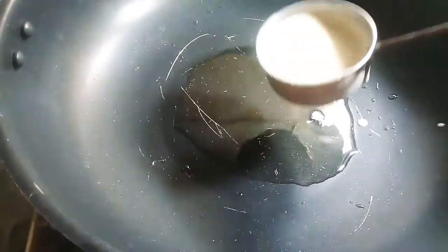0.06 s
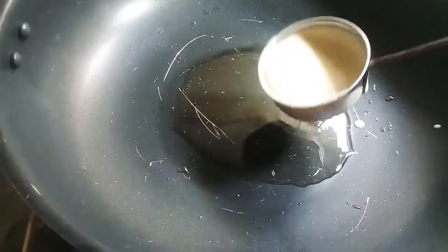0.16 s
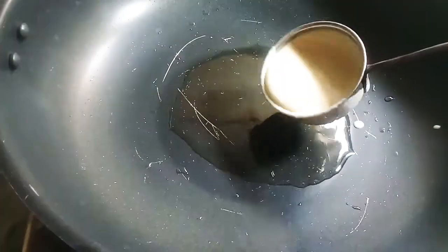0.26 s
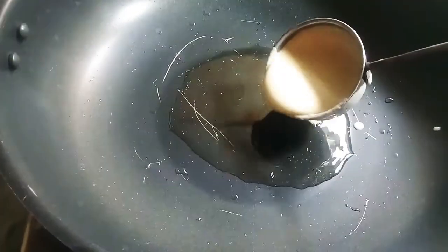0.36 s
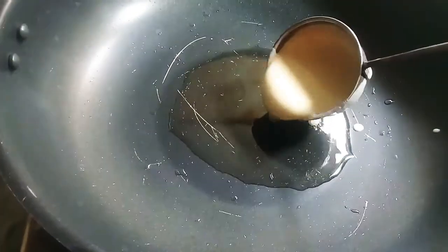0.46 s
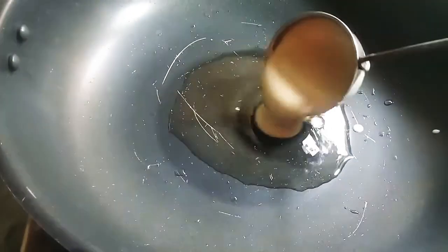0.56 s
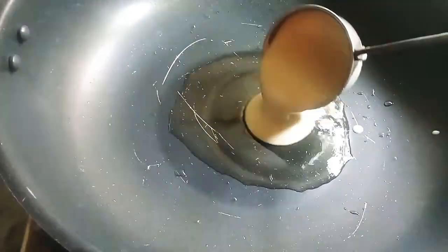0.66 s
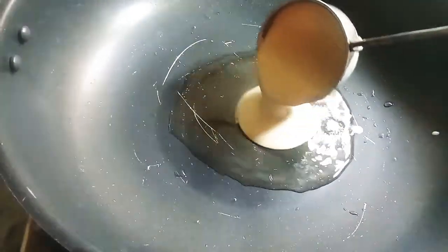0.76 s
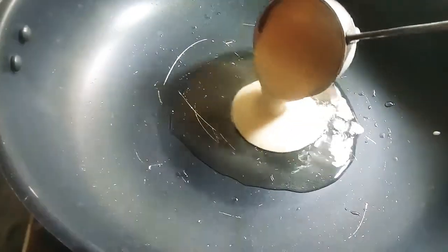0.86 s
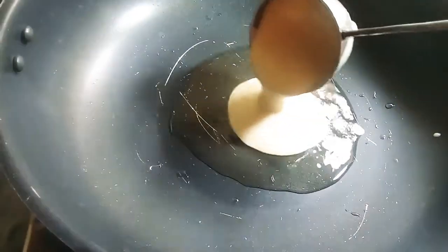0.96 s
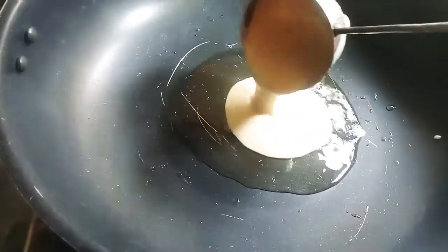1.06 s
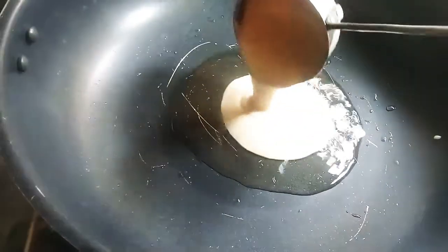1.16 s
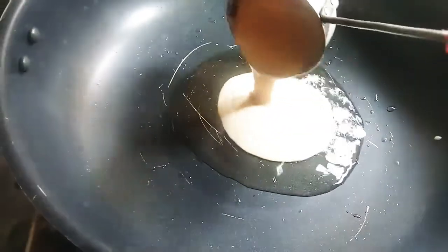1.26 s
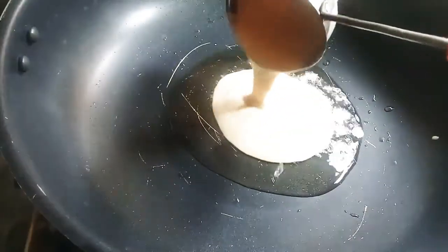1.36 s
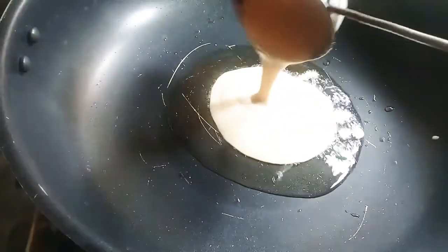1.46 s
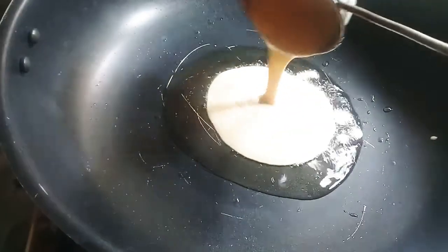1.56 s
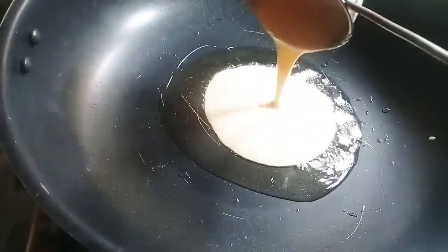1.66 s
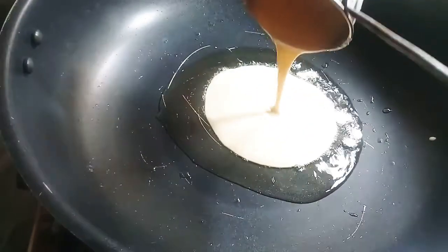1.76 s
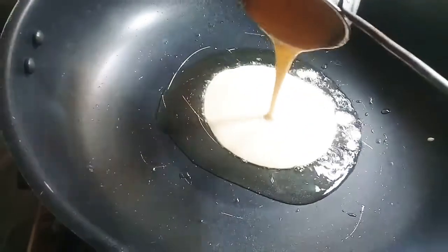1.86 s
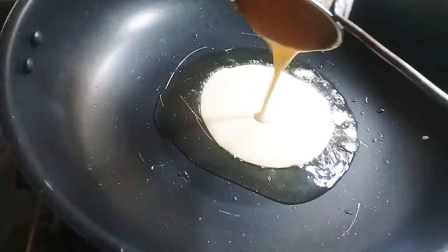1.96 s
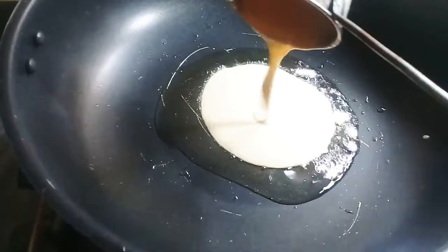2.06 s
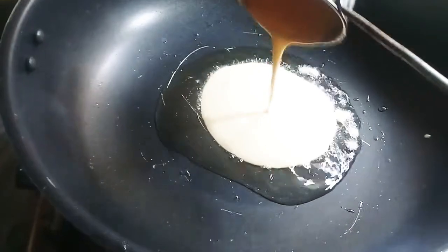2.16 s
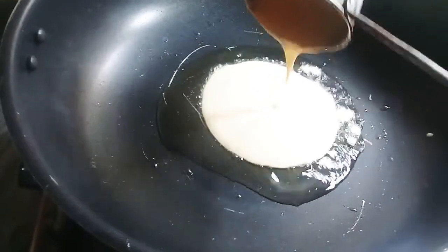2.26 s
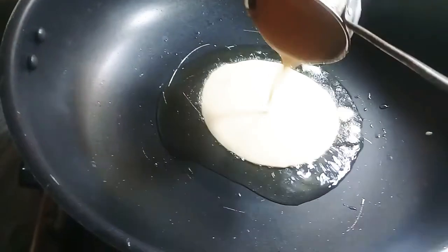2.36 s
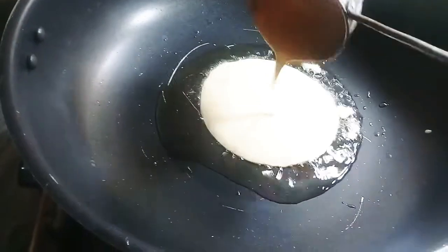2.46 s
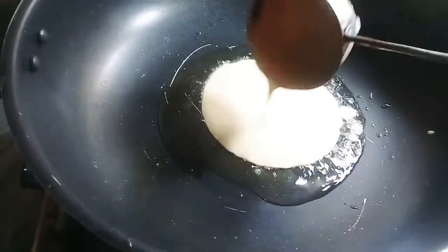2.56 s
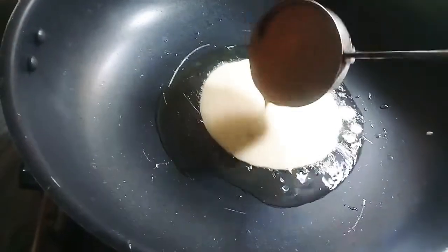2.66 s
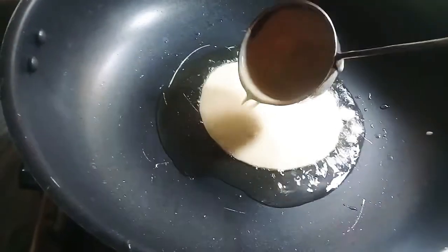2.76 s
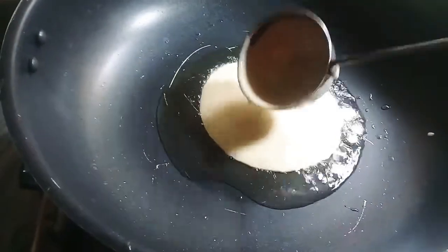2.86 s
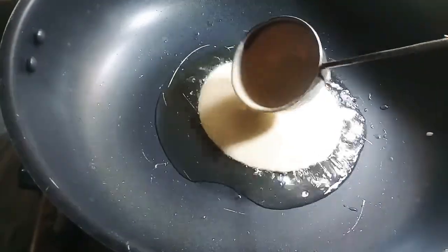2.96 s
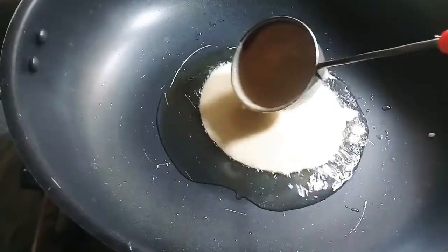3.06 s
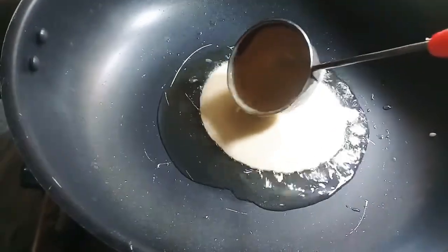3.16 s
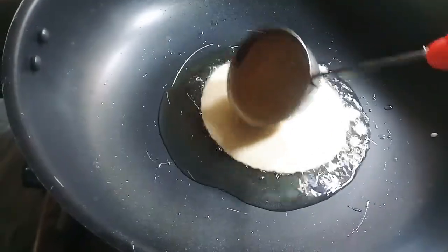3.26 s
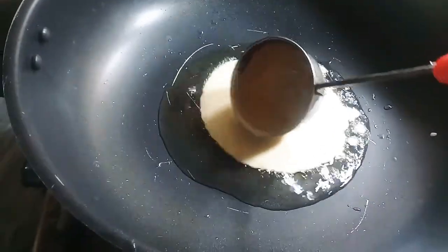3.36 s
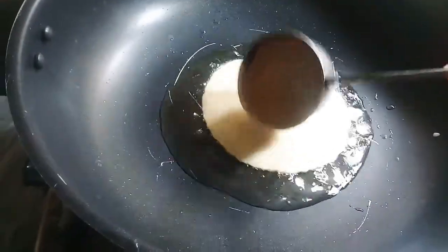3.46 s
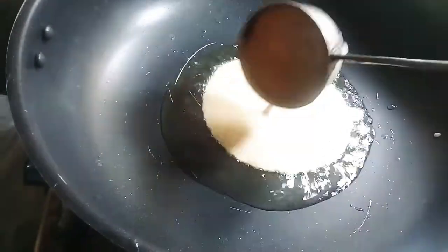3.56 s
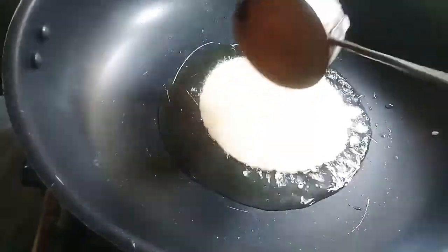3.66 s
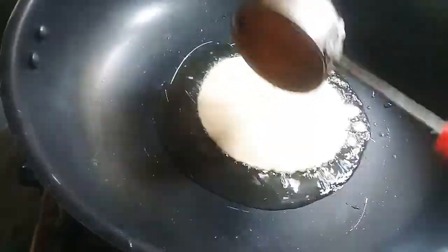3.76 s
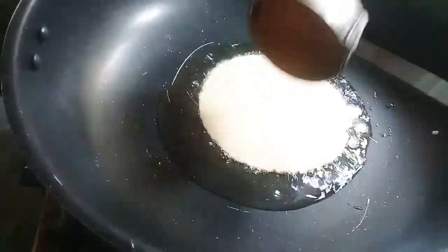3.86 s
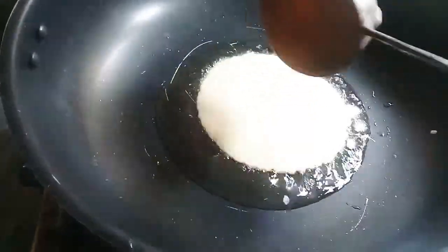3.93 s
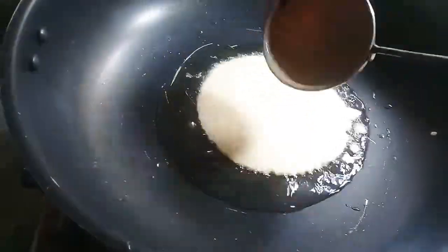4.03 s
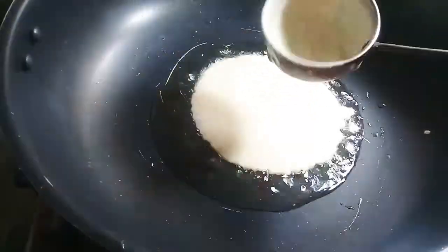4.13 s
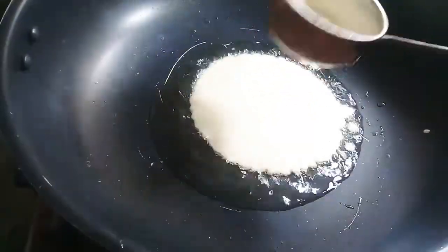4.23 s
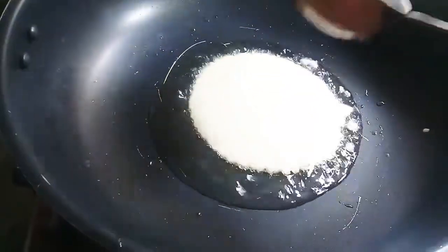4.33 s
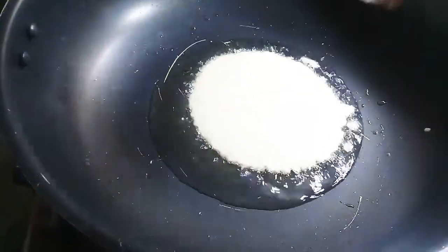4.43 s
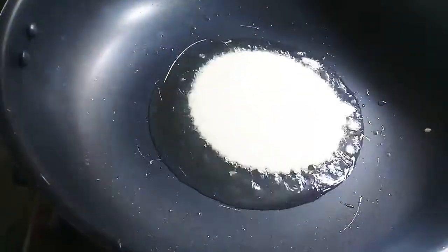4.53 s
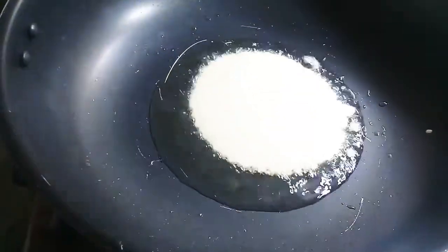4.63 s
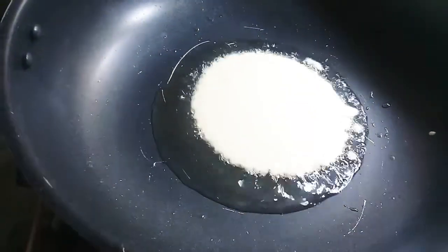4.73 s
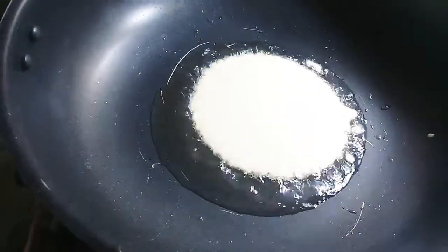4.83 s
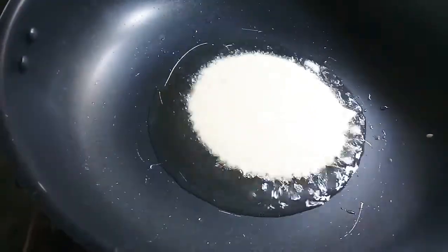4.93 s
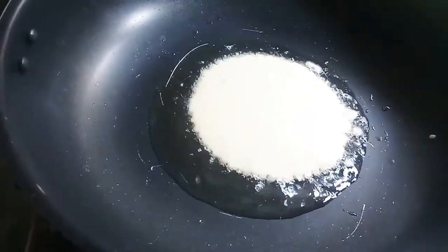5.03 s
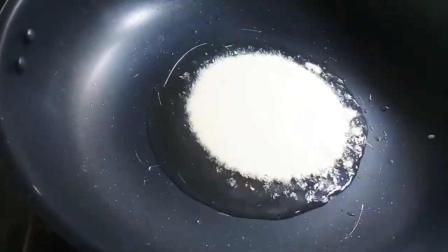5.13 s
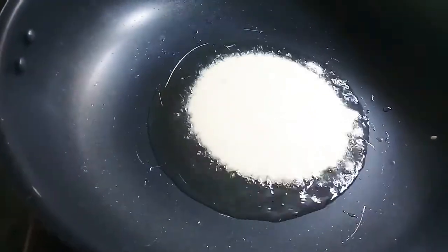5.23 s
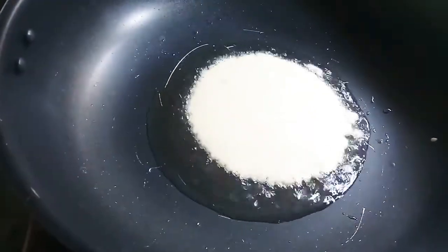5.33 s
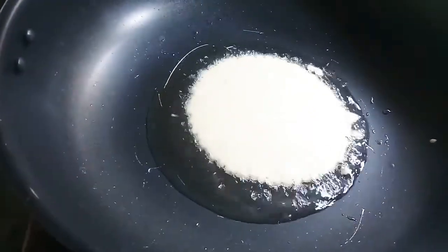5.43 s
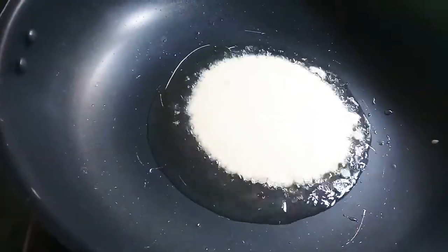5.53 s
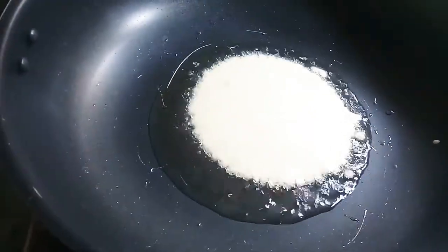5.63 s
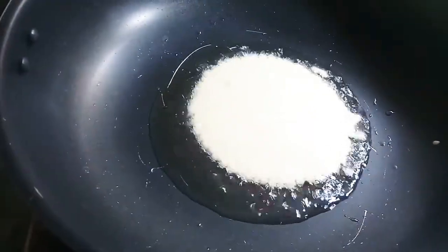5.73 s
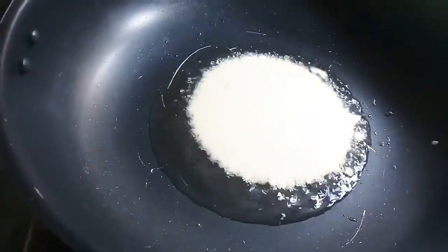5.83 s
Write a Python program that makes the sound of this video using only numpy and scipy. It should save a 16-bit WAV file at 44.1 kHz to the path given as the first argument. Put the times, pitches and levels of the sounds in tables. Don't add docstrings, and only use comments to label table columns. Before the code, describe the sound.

Close frying in a wide steel pan: faint drops and dribble first, then batter hits hot oil and a dense, bright sizzle leaps up. It cools steadily, with scattered ticks and a cluster of louder spits midway. Near the end a ladle touches a bowl, then clinks sharply on steel, stirring a last flurry. One close microphone, quiet kitchen, low rumble behind.

```python
import sys
import numpy as np
from scipy import signal
from scipy.fft import rfft, irfft, next_fast_len
from scipy.io import wavfile

SR = 44100
rng = np.random.default_rng(int(sys.argv[2]) if len(sys.argv) > 2 else 0)


def to_wav(s):
    ch = np.atleast_2d(s).T
    pcm = np.round(np.clip(ch, -1, 1) * 32767)
    wavfile.write(sys.argv[1], SR, pcm.astype(np.int16))


def nominal_scale(level):
    x = np.asarray(level, float) / 20
    return 10 ** x


N = 259749


def evened(x):
    return x / np.sqrt(np.mean(x ** 2) + 1e-20)


def read(points, hz):
    f, value = np.transpose(points)
    return np.interp(np.log(hz + 1), np.log(f + 1), value)


def add(mix, s, sound):
    part = mix[round(s * SR):][:len(sound)]
    part += sound[:len(part)]


def coloured(x, gain):
    size = next_fast_len(len(x))
    hz = np.fft.rfftfreq(size, 1 / SR)
    return irfft(rfft(x, size) * gain(hz), size)[:len(x)]


def wander(rate_hz, slowest_hz=0.):
    noise = rng.standard_normal(N)
    return evened(coloured(noise, lambda f: (f >= slowest_hz) / (1 + (f / rate_hz) ** 2)))


def sine(hz, t):
    return np.sin(2 * np.pi * hz * t)


def puffs(rows, rise_s, body=np.ones_like):
    out, t = np.zeros(N), np.arange(8192) / SR
    for s, db, hz, t60, share in rows:
        half_width = share * hz / 2
        noise = rng.standard_normal(len(t))
        noise = evened(coloured(noise, lambda f: body(f) / (1 + ((f - hz) / half_width) ** 4)))
        fade = nominal_scale(db - 8.5 - 60 * t / t60)
        add(out, s, fade * noise * np.minimum(t / rise_s, 1))
    return out


# pitch in Hz, strength in dB per Hz.
RUMBLE_COLOUR = [(12, -44), (20, -15), (49, -17), (92, 2), (111, -4.5), (125, -9), (161, -17), (195, -11),
                 (235, -18.5), (330, -11.5), (450, -19.5), (620, -26.5), (850, -35), (1600, -46)]
# pitch in Hz, width of its wavering in Hz, level in dB.
HUM_TONES = [(102.5, 1.1, -58.5), (85, 13, -65.5)]


def appliances():
    rumble_db, hiss_db = -54.5, -84
    t = np.arange(N) / SR
    rumble = coloured(rng.standard_normal(N), lambda f: nominal_scale(read(RUMBLE_COLOUR, f)))
    out = nominal_scale(rumble_db - 2.5) * evened(rumble)
    for hz, width_hz, db in HUM_TONES:
        level = nominal_scale(db + 2.1 * wander(width_hz))
        out += level * np.sqrt(2) * np.sin(2 * np.pi * hz * t + 0.55 * wander(width_hz))
    return out + far_motor(t) + nominal_scale(hiss_db) * rng.standard_normal(N)


def far_motor(t):
    loudest_s, hold_s, hz, db = 2.21, 0.2, 130, -53.5
    rise_db_per_s, fall_db_per_s = 103, 132
    before = np.maximum(loudest_s - t, 0)
    after = np.maximum(t - loudest_s - hold_s, 0)
    swell_db = -rise_db_per_s * before - fall_db_per_s * after
    return nominal_scale(db + swell_db) * np.sqrt(2) * sine(hz, t)


def kitchen(x, t60=.25):
    taps = np.zeros(SR // 3)
    at = np.arange(120, len(taps) - 20, 20)
    taps[at + rng.integers(0, 20, len(at))] = rng.choice([-1., 1.], len(at))
    taps *= nominal_scale(-60 * np.arange(len(taps)) / SR / t60)
    return signal.fftconvolve(x, taps / np.linalg.norm(taps))[:N]


# start in seconds, peak in dB, centre in Hz, time to die by 60 dB in seconds, width as a share of centre.
LADLE_KNOCKS = [
    (0.563, -37.5, 326, 0.17, 0.74),
    (5.405, -29.5, 1440, 0.28, 0.96),
    (5.479, -40, 1510, 0.19, 0.94),
    (5.53, -33, 1460, 0.12, 0.41),
    (5.665, -34.5, 1110, 0.35, 0.71),
    (5.699, -33, 1100, 0.16, 0.26),
    (5.789, -35, 320, 0.39, 0.92),
]


def knocks():
    return puffs(LADLE_KNOCKS, 0.0019)


def struck(modes_hz, modes, contact, wobble_db, rises_s):
    out, t = np.zeros(N), np.arange(SR // 2) / SR
    *contacts_s, blow_db = contact
    for hz, (*blows_db, t60) in zip(modes_hz, modes):
        swing = sum(np.sin(2 * np.pi * (f * t + rng.random())) for f in rng.uniform(5.1, 23.5, 3))
        level_db = wobble_db * swing * np.minimum(t / 0.13, 1) - 60 * t / t60
        ring = nominal_scale(level_db) * np.sin(2 * np.pi * (hz * t + rng.random()))
        for s, db, rise_s in zip(contacts_s, blows_db, rises_s):
            add(out, s, nominal_scale(blow_db + db) * ring * np.minimum(t / rise_s, 1))
    return out


BOWL_PITCHES = [2643, 3074, 3440, 3930, 4797, 4877, 6643, 8742, 11080]
# first contact in dB, rebound in dB, time to die by 60 dB in seconds.
BOWL_RINGS = [(-25, -33, .29), (-1, 3.5, 0.083), (-9, -20, 0.063), (-23, -32, .06), (-5, -20, 0.11),
              (-6, -19, 0.094), (-22, -34, .1), (-23, -34, .08), (-15, -36, .08)]


def bowl_touch():
    touch = (5.407, 5.416, -26.5)
    return struck(BOWL_PITCHES, BOWL_RINGS, touch, 1.4, (.003, .008))


# first contact in seconds, rebound in seconds, blow in dB.
CLINK = (5.509, 5.545, -14)
STEEL_PITCHES = [1510, 1589, 2176, 2607, 2773, 2844, 3168, 4637, 4773, 5548, 5700, 6306, 6634, 6644, 7166,
                 8742, 9836, 9862, 10395, 10579, 10660, 11191, 11945, 12902, 12961, 13343, 13625, 14265,
                 14414, 14486]
# first contact in dB, rebound in dB, time to die by 60 dB in seconds.
STEEL_RINGS = [(-13, -19, 0.17), (-8, -23, 0.076), (-27.5, -27, 0.87), (-37, -24, 0.94), (-1, -28, 0.42),
               (-8.5, -36, 0.61), (-18, -21, 0.25), (-6, -31, 0.51), (-5, -25, 0.09), (-13, -31, 0.68),
               (-15, -30, 0.24), (-23, -7.5, 0.28), (-18, -28, 0.35), (-16, -34, 0.52), (-27, -32, 0.64),
               (-31, -36, 0.4), (-32, -14.5, 0.17), (-17, -27, 0.26), (-21, -18, 0.28), (-30, -17, .25),
               (-13, -27, 0.42), (-28, -21, .16), (-26, -23, 0.28), (-15, -22, .2), (-15, -18, 0.3),
               (-19, -16, 0.19), (-16, -18, 0.21), (-18, -22, .2), (-17, -24, 0.23), (-17, -22, .2)]


def steel_clink():
    return struck(STEEL_PITCHES, STEEL_RINGS, CLINK, 1.0, (.0015, .012))


# pitch in Hz, level in dB, time to die by 60 dB in seconds.
SLOW_TWINS = [(2181, -28, 1.6), (2766, -14, 0.5), (4653, -18, 0.9), (5563, -28, .9), (6289, -20, 0.46)]


def twins():
    out, t = np.zeros(N), np.arange(SR // 2) / SR
    ring = sum(nominal_scale(db - 60 * t / t60) * sine(hz, t) for hz, db, t60 in SLOW_TWINS)
    add(out, CLINK[0], nominal_scale(CLINK[2]) * ring * np.minimum(t / 0.0028, 1))
    return out


# pitch in Hz, strength in dB per Hz.
CRACK_COLOUR = [(150, -37), (350, -19), (1500, -6), (2600, -6), (4000, -9.5), (5700, -25), (8000, -19.5),
                (10500, -13), (11800, -16.5), (13200, -14), (15000, -17), (17000, -26)]
# pitch in Hz, time to die by 60 dB in seconds.
CRACK_FADE = [(400, 0.49), (1500, 0.23), (4000, 0.25), (9000, 0.38), (15000, 0.3)]


def crack(level_db=-25, rise_s=0.0011):
    hz, t, z = signal.stft(rng.standard_normal(SR // 2), SR, nperseg=256)
    fade_db = 60 * t / read(CRACK_FADE, hz)[:, None]
    z = z * nominal_scale(read(CRACK_COLOUR, hz)[:, None] - fade_db)
    sound = signal.istft(z, SR, nperseg=256)[1]
    sound = sound * np.minimum(np.arange(len(sound)) / SR / rise_s, 1)
    out = np.zeros(N)
    add(out, CLINK[0], nominal_scale(level_db) * sound / np.std(sound[:800]))
    return out


# start in seconds, peak in dB, pitch in Hz.
BUBBLE_TICKS = [(0.0488, -34, 11100), (0.1087, -36, 11500), (0.2194, -47, 11900), (0.2418, -41, 10500),
                (0.377, -50, 12100), (0.4813, -45, 13200), (0.5167, -45, 9870), (0.5741, -31, 14100),
                (0.606, -44, 11200), (0.6305, -42, 9740), (2.5825, -43, 10600), (2.81, -39, 11400),
                (2.9322, -30, 10900), (2.9771, -22.5, 10200), (3.0964, -24, 9420), (3.1517, -28, 7880),
                (3.3408, -42, 11700), (3.4246, -42, 9410), (3.714, -43, 7700), (3.8422, -30, 9510),
                (3.8821, -29, 7710), (4.0292, -41, 7710), (4.2033, -40, 10900), (4.5331, -41, 12200),
                (4.5685, -30, 12100), (4.8693, -42, 10400), (5.0095, -40, 13100), (5.0559, -41, 7980),
                (5.1407, -28, 10700)]


def ticks(cycles=2.2):
    out, t = np.zeros(N), np.arange(300) / SR
    for s, db, hz in BUBBLE_TICKS:
        fade = np.exp(-t * hz / cycles)
        add(out, s, nominal_scale(db) * sine(hz, t) * fade * np.minimum(t * hz, 1))
    return out


# start in seconds, peak in dB, centre in Hz, time to die by 60 dB in seconds, width as a share of centre.
OIL_SPITS = [(2.929, -38, 3260, 0.08, 0.37), (3.028, -35, 5800, 0.095, 0.29),
             (3.0796, -32.5, 3900, 0.25, 0.99), (3.2194, -42, 2450, 0.062, 0.32),
             (3.3794, -35, 3890, 0.08, 0.3), (3.414, -27.5, 4040, 0.099, 0.22),
             (3.4284, -25.5, 3480, 0.11, 0.69), (3.4987, -20.5, 3820, 0.06, 0.65),
             (3.5022, -27.5, 3760, 0.15, 0.36), (3.7494, -39, 4960, 0.08, 0.36),
             (3.7994, -35.5, 5640, 0.22, 0.6), (3.845, -33, 3980, 0.074, 0.45),
             (3.9894, -31, 4350, 0.071, 0.44)]
SHARP_POPS = [
    (1.58, -30, 7900, .04, .15),
    (1.755, -29, 5000, 0.05, .2),
    (5.481, -43, 3074, .12, 0.028),
    (5.48, -45, 4830, .1, .05),
]


def spits():
    return puffs(OIL_SPITS + SHARP_POPS, 0.0022)


# pitch in Hz, width in Hz, level in dB.
PAN_PEAKS = [(399.4, 20, -11), (1100, 280, -11.0), (1580, 23, -11.5), (2000, 52, -12), (2300, 90, -12),
             (2740, 44, -8), (2900, 90, -4.5), (3180, 36, -17), (3440, 83, -6.0), (3750, 38, -3.0),
             (4120, 38, -2.5), (4330, 76, -3), (4980, 95, -6.5), (5480, 63, -8.5), (5860, 28, -12.5),
             (6100, 30, -11.0), (6600, 76, -17), (7250, 39, -27), (7900, 30, -25), (8900, 70, -39),
             (9250, 65, -28), (9500, 67, -29), (9900, 51, -20.0), (10600, 88, -18.5), (11200, 65, -17),
             (12100, 72, -16), (13600, 65, -20.5), (14460, 80, -27)]


def pan_modes(f):
    grid = np.arange(0, SR / 2, 4)
    power = np.zeros(len(grid))
    for hz, width_hz, db in PAN_PEAKS:
        power += nominal_scale(db) ** 2 / (1 + (2 * (grid - hz) / width_hz) ** 2) ** 0.9
    return np.interp(f, grid, np.sqrt(power))


# start in seconds, peak in dB, centre in Hz, time to die by 60 dB in seconds, width as a share of centre.
FIRST_DROPS = [(0.049, -44, 2740, 0.076, 0.47), (0.1044, -50, 2920, 0.078, 0.61),
               (0.2049, -45, 4100, 0.087, 0.77), (0.2414, -39, 10400, 0.075, 0.63),
               (0.305, -41, 6620, 0.086, 0.5), (0.3244, -40.5, 4120, 0.36, 0.36),
               (0.387, -35, 4120, 0.092, 0.61), (0.4744, -33, 2980, 0.088, 0.56),
               (0.5144, -31, 2840, 0.12, 0.54), (0.555, -21, 2830, 0.069, 0.44)]


def drops():
    return puffs(FIRST_DROPS, 0.0053, pan_modes)


# time in seconds, vigour in dB.
DRIBBLE_VIGOUR = [(0.0, -10), (0.234, -17.5), (0.292, -19), (0.425, -0.5), (0.506, -7.5), (0.52, -2),
                  (0.566, -6), (0.6, -4.5), (0.66, -2)]
# time in seconds, vigour in dB.
OIL_HEAT = [(0.78, 0.5), (1.58, -3), (2.03, -6), (2.88, -10.5), (3.23, -12), (3.89, -12), (4.6, -13.5),
            (5.21, -16), (5.89, -18.5)]
# full boil reached in seconds, build-up in dB per second, full level in dB,
# share of the cooling (0-2), first flush in dB.
BOIL_BY_SIZE = [
    (0.73, 132, -36.5, 0.96, -0.6),
    (0.655, 190, -47, 0.48, -1),
    (0.78, 196, -45, 1.1, -5.5),
    (0.845, 167, -58, 0.55, 12),
    (0.812, 240, -51, 0.77, -1.5),
]
# dribble in dB, share of its vigour (0-1), swell after the
# clink in dB.
STIRRED_BY_SIZE = [(-47, 0.91, -42), (-70, 0.1, -56), (-76.5, 0.3, -46), (-68, 0.7, -51.5), (-76, 0.5, -49)]
# start in seconds, level in dB, fade in dB per second.
FINE_SPRAY = [
    (0.0, -60, 32),
    (0.238, -55.5, 56),
    (0.33, -58.5, 35.5),
    (0.572, -61, 150),
]


def vigour(t):
    flush_s, covered_s = 0.45, 0.67
    lift_rise_s, lift_fade_db_per_s = 0.044, 34
    dribble = np.interp(t, *np.transpose(DRIBBLE_VIGOUR))
    heat = np.interp(t, *np.transpose(OIL_HEAT))
    since = np.maximum(t - CLINK[0], 0)
    lift = np.minimum(since / lift_rise_s, 1) * nominal_scale(-lift_fade_db_per_s * since)
    power = []
    for boil, stirred in zip(BOIL_BY_SIZE, STIRRED_BY_SIZE):
        at, build, full_db, share, flush_db = boil
        bare_db, follow, lift_db = stirred
        flush = flush_db * np.exp(-abs(t - at) / flush_s)
        boil_db = full_db + share * heat - build * np.maximum(at - t, 0) + flush
        early = (t < at) * nominal_scale(bare_db + follow * dribble) ** 2
        power.append(nominal_scale(boil_db) ** 2 + early + (nominal_scale(lift_db) * lift) ** 2)
    for s, db, fade in FINE_SPRAY:
        power[1] = power[1] + (t >= s) * nominal_scale(db - fade * abs(t - s)) ** 2
    bare = np.where(t < covered_s, 0.84 - 0.3 * dribble, 0.1)
    return 10 * np.log10(power), bare


# lowest in Hz, highest in Hz.
BUBBLE_RANGES = [
    (1980, 6340),
    (5780, 21400),
    (1106, 2040),
    (325, 508),
    (576, 1215),
]
BURST_RATES = [8850, 4920, 4070, 2940, 3000]
BURST_SPREADS = [1.94, 1.6, 1.5, 2.5, 2]
PAN_COUPLING = [0.97, 0.25, 1.05, 6.5, 1.05]
# pitch in Hz, strength in dB per Hz.
FIZZ_COLOUR = [(150, -51), (250, -4), (399, -10.5), (450, -14.5), (647, -11), (718, -4), (1130, -2),
               (1410, -5.5), (1620, 1.5), (2580, -2.5), (2970, -1), (4980, -5), (6920, -6), (11000, -7.5),
               (15600, -12)]


def frying(skirt=18, flicker_db=.6, patchy_db=0.49):
    out, shared = np.zeros(N), wander(21, 3.4)
    levels, bare = vigour(np.arange(N) / SR)
    sparse = np.clip((-31.5 - levels[0]) / 14, .2, 1.3)
    sizes = zip(levels, BUBBLE_RANGES, BURST_RATES, BURST_SPREADS, PAN_COUPLING)
    for level_db, (lo, hi), rate, spread_db, coupling in sizes:
        loudness = nominal_scale(spread_db * np.minimum(rng.exponential(1, (2, N)), 5))
        happens = rng.random((2, N)) < rate / SR
        bursts = loudness * rng.choice([-1, 1], N) * happens
        band = lambda f: 1 / ((1 + (lo / (f + 1)) ** skirt) * (1 + (f / hi) ** skirt))
        fizz = evened(coloured(bursts[0], lambda f: band(f) * nominal_scale(read(FIZZ_COLOUR, f))))
        rung = evened(coloured(bursts[1], lambda f: band(f) * pan_modes(f)))
        ring = np.clip(coupling * bare, 0, .97)
        layer = np.sqrt(1 - ring) * fizz + np.sqrt(ring) * rung
        flicker = flicker_db * shared + patchy_db * wander(9.6, 4)
        out += layer * nominal_scale(level_db + sparse * flicker)
    return out


def scene():
    oil = frying() + spits() + drops() + ticks()
    ladle = steel_clink() + twins() + bowl_touch() + crack() + knocks()
    mono = appliances() + oil + ladle
    mono += nominal_scale(-8.5) * kitchen(oil, 0.037)
    mono += nominal_scale(-11) * kitchen(ladle, 0.31)
    return np.array([mono, mono])


def roll_off(x):
    return signal.sosfilt(signal.butter(12, 16840, fs=SR, output="sos"), x)


def record(dry):
    edge = signal.firwin(801, 15760, window=("kaiser", 9), fs=SR)
    return roll_off(signal.oaconvolve(dry, edge[None], "same"))


dry = scene()
out = record(dry)
to_wav(out)
```